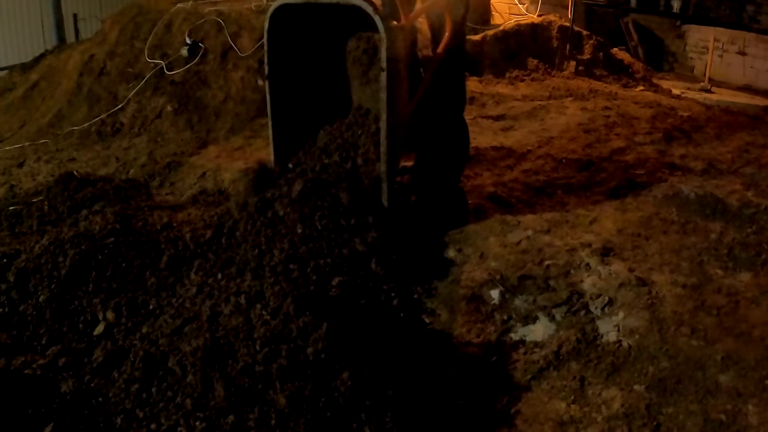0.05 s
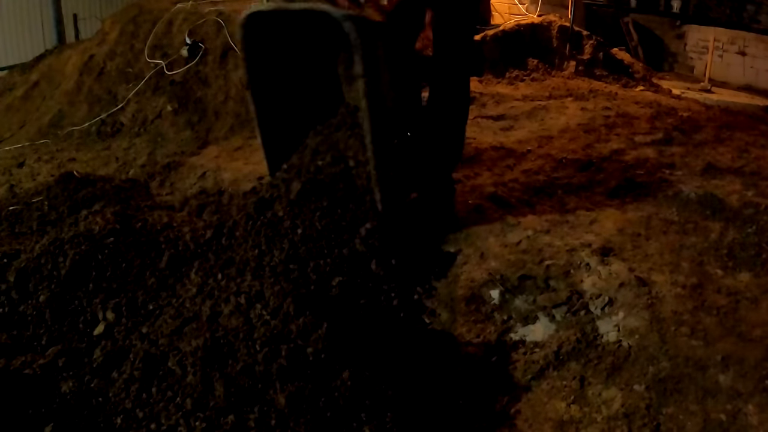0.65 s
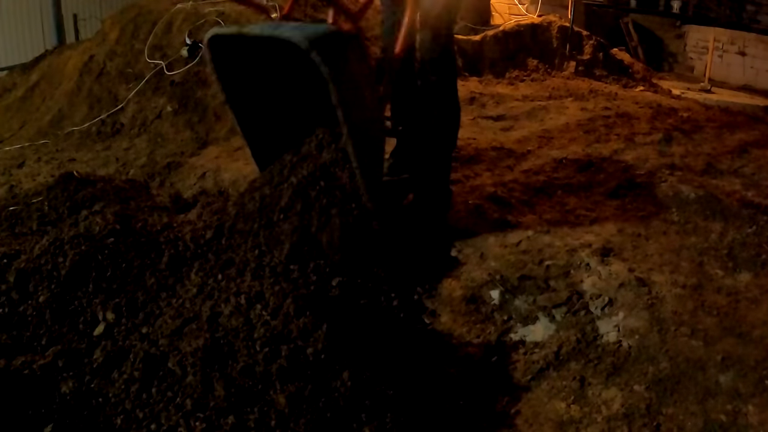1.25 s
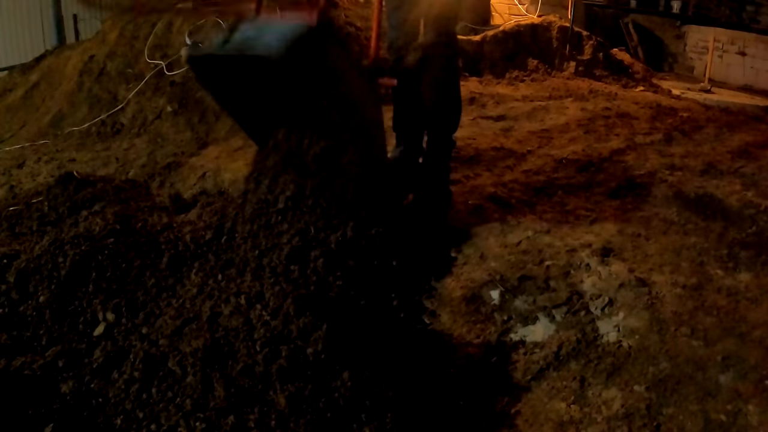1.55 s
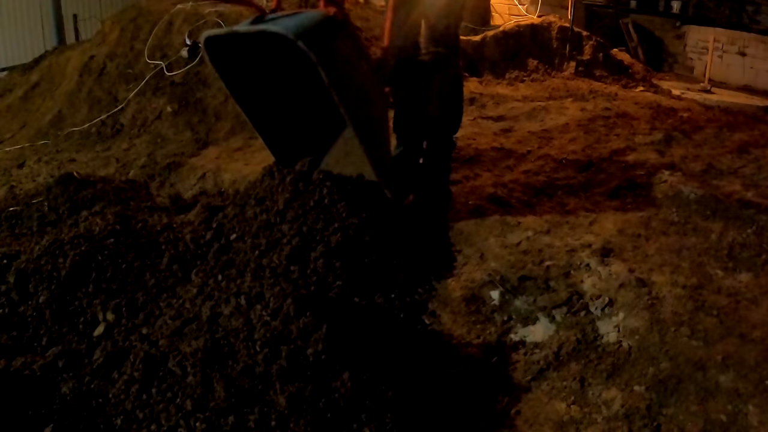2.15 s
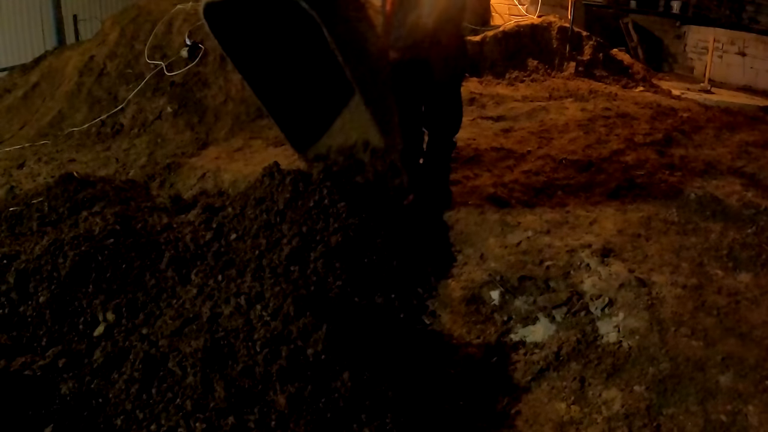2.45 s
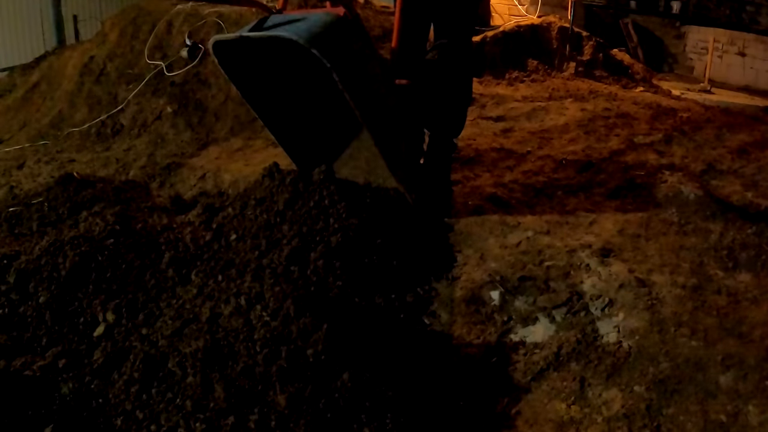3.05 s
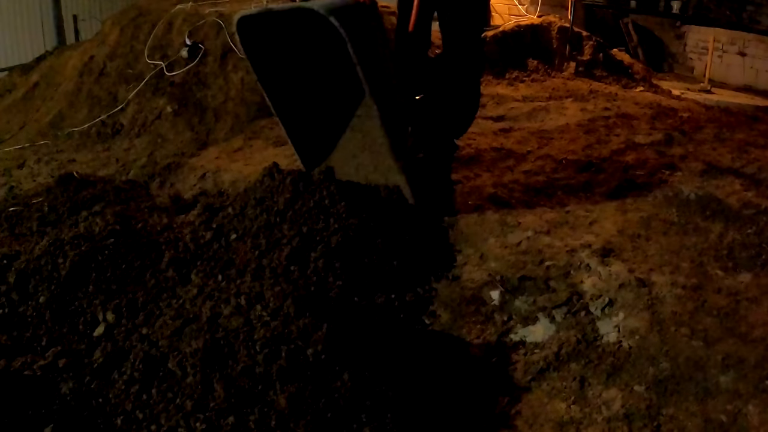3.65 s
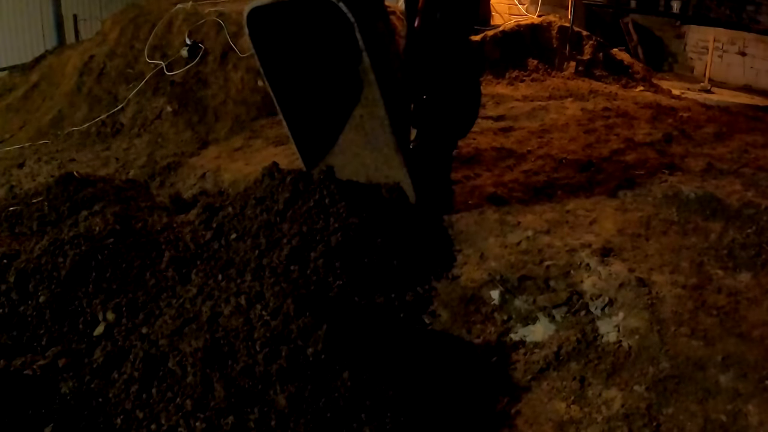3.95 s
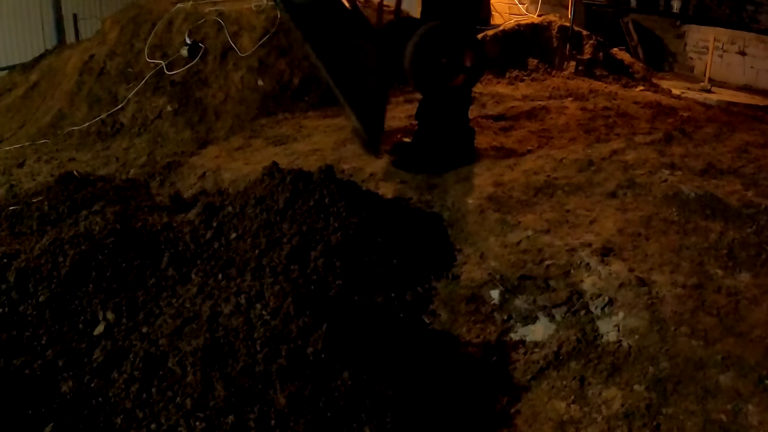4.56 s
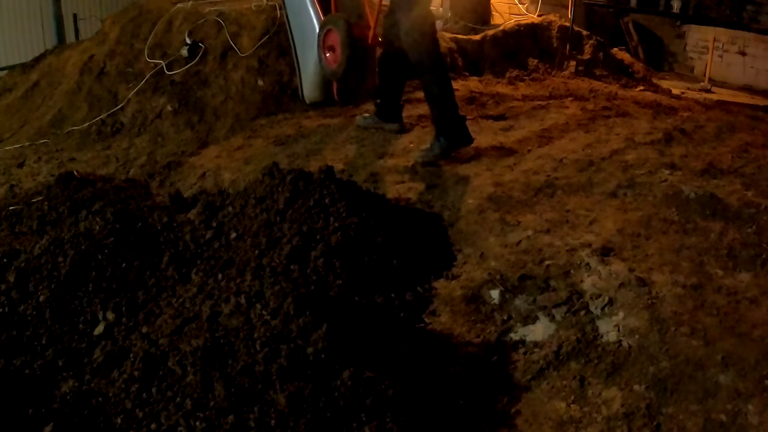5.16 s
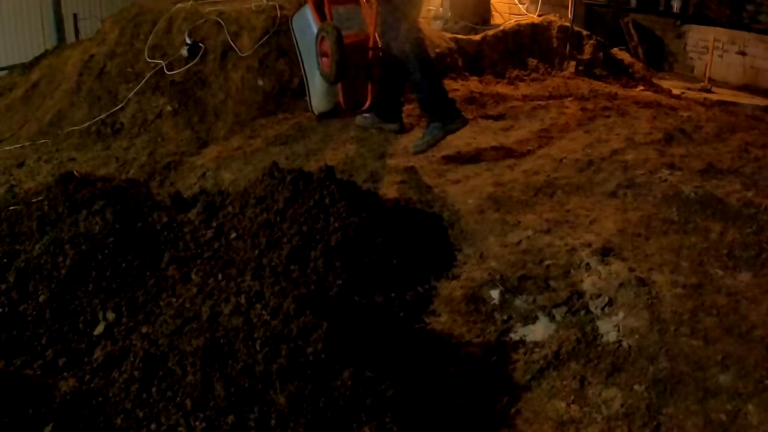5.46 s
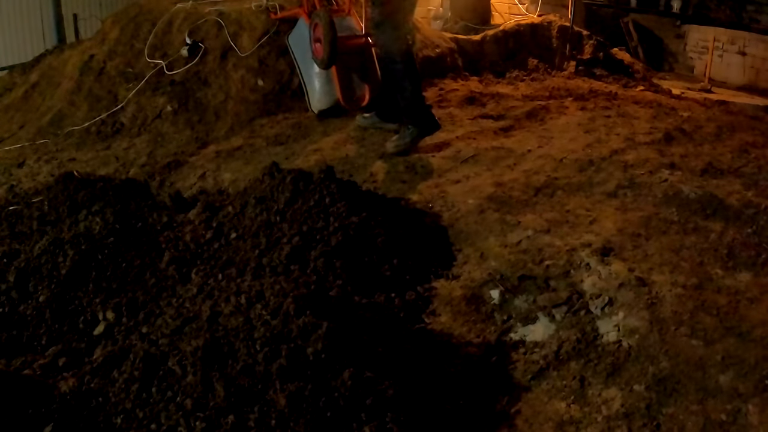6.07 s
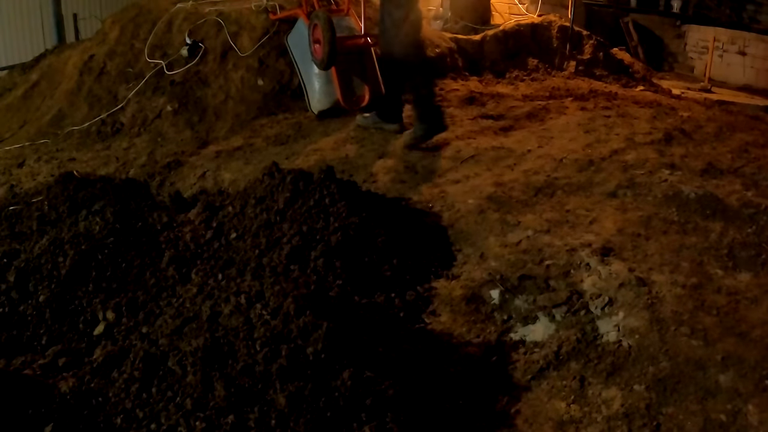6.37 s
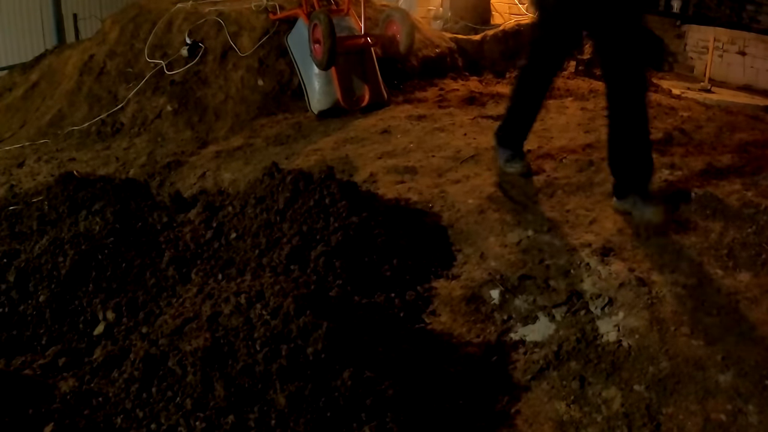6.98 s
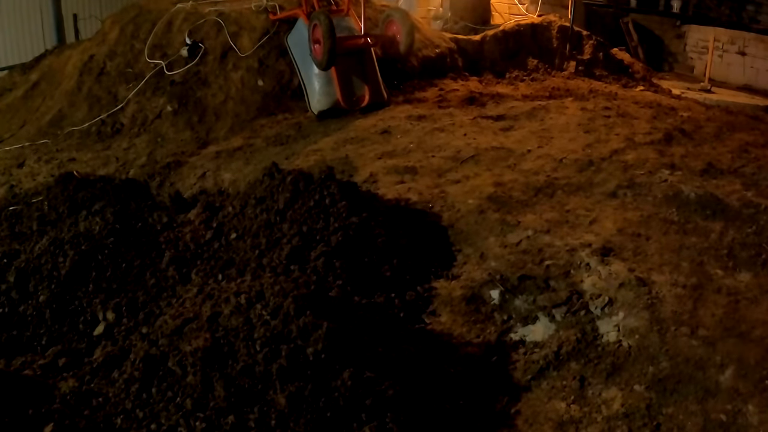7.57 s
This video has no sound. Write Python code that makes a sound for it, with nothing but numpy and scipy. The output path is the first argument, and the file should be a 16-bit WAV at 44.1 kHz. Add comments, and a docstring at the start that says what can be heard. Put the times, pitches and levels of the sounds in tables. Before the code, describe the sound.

Earth trickles from a wheelbarrow outdoors, two loud rattling metal bangs shake it empty, then the wheel ticks and boots tread on dirt.

```python
"""On a building plot, over distant traffic and a low rumble, earth trickles and a wheel ticks as a steel
wheelbarrow is tipped onto a pile of soil. At 1.7 s and 2.8 s it is slammed to empty it: each impact
excites the modes of the tub, which booms, rattles in weakening rebounds and spills crumbs of earth.
From 4.5 s the wheel ticks again as the barrow is pulled back and stood up. Last, boots tread away
over the dirt, each a few soft bumps with a scuff of grit."""
import sys
import numpy as np
from scipy import signal
from scipy.fft import rfft, irfft
from scipy.io import wavfile
from scipy.ndimage import uniform_filter1d, minimum_filter1d

SR = 44100
rng = np.random.default_rng(int(sys.argv[2]) if len(sys.argv) > 2 else 0)


def int16_out(signal):
    """Quantize to a 16-bit WAV file."""
    q = np.round(np.clip(np.atleast_2d(signal).T, -1, 1) * 32767)
    wavfile.write(sys.argv[1], SR, q.astype(np.int16))


N = 344862

# impacts on the whole tub; the second slam strikes twice
# (t/s, ring/dB, place from 0 nose to 1 frame, rebound gap/s, thump/dB, clatter/dB, crack/dB, spill/dB)
SLAMS = [(1.709, 5, 0, .0125, -16.5, -12.5, -32.5, -39), (2.7866, 6, 0.96, .019, -20, -16, -25.5, -33),
         (2.944, -6.5, 0.46, .0095, -20, -31, -37.5, -53)]
# spectrum of a dry tick (f/Hz, level/dB, T60/s)
TICK_SPECTRUM = [(800, -10, 0.0048), (3000, -1.5, 0.0061), (5240, -1, 0.0035), (6500, -17, .005),
                 (8200, -4, 0.011), (10500, -14.5, 0.0045), (12500, -23, 0.0029), (13800, -32, 0.0037)]


def amp(db):
    """Amplitude ratio of a level in decibels."""
    return 10 ** (np.asarray(db) / 20)


def unit(x):
    """Normalisation to rms 1."""
    return x / np.sqrt(np.mean(x ** 2) + 1e-20)


def at_hz(table, hz, column=1):
    """Interpolation of a table column over log frequency."""
    columns = np.transpose(table)
    return np.interp(np.log(hz + 1), np.log(columns[0] + 1), columns[column])


def curve(table):
    """Linear interpolation of (t/s, value) rows at every sample."""
    return np.interp(np.arange(N) / SR, *np.transpose(table))


def add(mix, s, sound):
    """Superposition of a sound on the mix, starting at time s."""
    part = mix[max(round(s * SR), 0):][:len(sound)]
    part += sound[:len(part)]


def colour(x, spectrum):
    """Spectral shaping of a long signal, at rms 1."""
    return unit(irfft(rfft(x) * amp(at_hz(spectrum, np.fft.rfftfreq(N, 1 / SR))), N))


def burst(spectrum, rise_s, tilt_db=0, size=20000, band_count=14):
    """Frequency-dependent damping: each noise band has its own decay. The tilt is per octave."""
    hz, t = np.fft.rfftfreq(size, 1 / SR), np.arange(size) / SR
    magnitude = amp(at_hz(spectrum, hz) + tilt_db * np.log2(hz / SR + 0.0012))
    bins = magnitude * np.exp(2j * np.pi * rng.random(len(hz)))
    edges = np.geomspace(30, SR / 2, band_count)
    in_band = np.searchsorted(edges, hz) == np.arange(band_count)[:, None]
    bands = irfft(bins * in_band, size)
    decay = np.exp(-np.log(1000) * t / at_hz(spectrum, edges, column=2)[:, None])
    return (bands * decay).sum(0) / bands.sum(0).std() * (1 - np.exp(-t / rise_s))


def gritty(x, spread_db, width=30):
    """Random amplitude modulation breaks a sound into grains at the same mean power."""
    wander = unit(uniform_filter1d(rng.standard_normal(len(x)), width))
    return x * unit(amp(spread_db * wander))


def waver(slow_hz=0.794, fast_hz=5, count=20):
    """Slow sines of random phase sum to a fluctuation of rms 1."""
    t = np.arange(0, N, 256) / SR
    rates = np.geomspace(slow_hz, fast_hz, count)
    waves = sum(np.sin(2 * np.pi * (hz * t + rng.random())) / np.sqrt(hz) for hz in rates)
    return np.interp(np.arange(N) / SR, t, unit(waves))


def diffuse_field(spectrum, level_db):
    """Noise from all round is nearly coherent at the two ears in the bass, less so above."""
    # likeness of left and right (f/Hz, coherence)
    coherence = [(60, 0.99), (130, 0.99), (290, 0.94), (620, 0.75), (1360, 0.26), (2970, 0.41),
                 (6490, 0.47), (14200, 0.6)]
    left, independent = rfft(rng.standard_normal((2, N)))
    shared = np.clip(at_hz(coherence, np.fft.rfftfreq(N, 1 / SR)), 0, 1)
    right = shared * left + np.sqrt(1 - shared ** 2) * independent
    return colour(irfft(np.array([left, right]), N), spectrum) * amp(level_db)


def traffic(waver_db=0.43):
    """Distant vehicles merge into diffuse broadband noise."""
    # traffic spectrum (f/Hz, level/dB)
    spectrum = [(60, -8.5), (150, -5.5), (260, -1.5), (450, -2.5), (840, -3.5), (930, 3.5), (1200, 0),
                (1700, -6), (2300, -15.5), (3200, -25), (4500, -34.5), (8000, -45.5), (11000, -70.5),
                (14000, -80)]
    # its envelope (t/s, level/dB)
    levels = [(0, -44), (1.6, -43), (2.2, -44.5), (3.5, -45), (4.6, -43.5), (5.7, -42), (6.31, -40),
              (6.36, -47), (7.1, -47), (7.82, -46)]
    return diffuse_field(spectrum, curve(levels) + waver_db * waver())


def rumble(waver_db=1.0):
    """Slow amplitude modulation makes diffuse low noise lumpy."""
    # rumble spectrum (f/Hz, level/dB)
    spectrum = [(10, -12.5), (25, -11), (45, -5.5), (64, -0.5), (85, -5), (120, -10.5), (170, -16.5),
                (300, -23.5), (1000, -72.5), (14000, -105)]
    # its envelope (t/s, level/dB)
    levels = [(0, -38.5), (.8, -35.5), (.92, -41), (1.3, -36.5), (3.2, -36.5), (3.8, -42.5), (4.1, -39.5),
              (5.5, -38.5), (6.28, -37.5), (6.38, -43.5), (7.82, -40.5)]
    return diffuse_field(spectrum, curve(levels) + waver_db * waver())


def soil_flow(rise_s=0.02, hold_s=0.067, fade_db_per_s=157):
    """Incoherent sources add in power: the joint amplitude of trickle, slides and slam spills."""
    # loose earth trickling as the barrow is handled (t/s, level/dB)
    trickle = [(0, -75), (.7, -67.5), (1.65, -64), (2.3, -75), (2.7, -67.5), (3.6, -75.5), (4.1, -77),
               (4.3, -66.5), (5.1, -71), (5.8, -78), (6.4, -79), (7.3, -69), (7.8, -71.5)]
    # swells of sliding or scuffed earth (peak t/s, length/s, level/dB)
    slides = [(0.044, .2, -62.5), (0.403, 0.28, -61), (0.94, 0.21, -65), (1.48, 0.16, -54.5),
              (2.01, 0.28, -60), (4.839, 0.57, -64.5), (5.09, 0.18, -61), (5.497, 0.28, -70),
              (6.98, 0.24, -68.5), (7.316, 0.18, -66.5), (7.82, 0.089, -65)]
    t = np.arange(N) / SR
    power = amp(curve(trickle)) ** 2
    for s, length, db in slides:
        power += (amp(db) * np.exp(-2 * np.pi * ((t - s) / length) ** 2)) ** 2
    for s, *_, spill_db in SLAMS:
        onset = np.clip((t - s) / rise_s, 0, 1)
        fade_db = fade_db_per_s * np.maximum(t - s - hold_s, 0)
        power += (onset * amp(spill_db - fade_db)) ** 2
    return np.sqrt(power)


def soil(grains_per_s=1800, spread_db=2.5, hiss=0.7):
    """Shot noise: tiny crumbs of uneven size land at random instants, over a hiss."""
    # spectrum of moving crumbs (f/Hz, level/dB)
    spectrum = [(800, -41.5), (2500, 5.5), (3900, -0.5), (5200, 3.5), (7500, -5), (9000, -10),
                (12000, -15.5), (13800, -51)]
    sizes = amp(spread_db * np.minimum(rng.exponential(1, N), 4)) * rng.standard_normal(N)
    landings = rng.random(N) < grains_per_s / SR
    stream = unit(sizes * landings) + hiss * rng.standard_normal(N)
    return colour(stream, spectrum) * soil_flow()


def clods(uneven_db=3, tilt_spread_db=5, rise_s=0.00096, crumb_s=0.0053, count=8):
    """Fracture gives each clod a short crunch; smaller ones dribble out at uneven intervals."""
    # spectrum of a crunch (f/Hz, level/dB, T60/s)
    crunch = [(500, -28, 0.027), (2000, 3, .04), (3200, 6, 0.077), (5300, 4, 0.038), (7500, -2.5, 0.076),
              (9500, -7.5, 0.13), (12500, -12.5, 0.028), (13800, -41.5, .03)]
    # larger clods breaking (t/s, level/dB, tilt/(dB per octave))
    breaks = [(.095, -47.5, -3), (.6704, -43.5, -5.5), (1.4262, -42, 0), (1.4729, -44, 5),
              (1.505, -39.5, -5.5), (2.047, -46.5, 3), (2.4113, -46, -3), (2.4983, -46, -3),
              (3.264, -45, 4.5), (3.483, -49.5, -5), (4.1755, -44.5, -1.5), (4.2382, -43.5, -3),
              (4.6016, -44, -3.5), (5.468, -31, -11), (6.095, -38, -10.5), (6.219, -45, -2),
              (6.2611, -41, -9.5)]
    # last crumbs leaving the tub (start t/s, end t/s, level/dB)
    dribbles = [(2.452, 2.759, -45), (3.229, 3.459, -53)]
    out, t = np.zeros(N), np.arange(4096) / SR
    for s, db, tilt_db in breaks:
        add(out, s, amp(db) * burst(crunch, rise_s, tilt_db, size=len(t)))
    for start, end, db in dribbles:
        for k, (shift, force, bright) in enumerate(rng.uniform(-1, 1, (count, 3))):
            s = start + (end - start) * (k + shift / 2) / count
            crumb = burst(crunch, rise_s, tilt_spread_db * bright, size=len(t)) * np.exp(-t / crumb_s)
            add(out, s, amp(db + uneven_db * force) * crumb)
    return out


def boots(heaviest_at=0.34, fade_db_per_roll=12.5, bumps=6):
    """Impact and friction: a boot rolls from heel to toe in soft bumps, grinding the grit."""
    # footfalls (t/s, length of roll/s, weight/dB, grit/dB)
    steps = [(.66, 0.098, -35, -65), (4.615, 0.043, -35, -70), (5.44, .14, -19, -55.5),
             (6.092, 0.026, -27.5, -58), (6.17, .11, -32, -66), (6.604, 0.0064, -42, -69),
             (6.68, 0.043, -49, -65), (7.28, .06, -52, -63), (7.599, 0.031, -43, -61)]
    # thud on packed earth (f/Hz, level/dB, T60/s)
    thud = [(25, -12, .08), (70, 1, 0.11), (131, 0.5, 0.23), (250, 4.5, 0.098), (363, -20, 0.078),
            (900, -19, 0.12), (4000, -84, .03)]
    # grit under the sole (f/Hz, level/dB, T60/s)
    scuff = [(500, -17, .06), (1500, -8, .06), (2800, 17.5, 0.18), (4000, 9, 0.17), (6500, 3, 0.28),
             (12000, -59, 0.035)]
    out = np.zeros(N)
    for s, length, weight_db, grit_db in steps:
        for roll in (np.arange(bumps) + rng.random(bumps) / 2) / bumps:
            weight = amp(weight_db) * burst(thud, rise_s=0.0041, size=8192)
            grit = amp(grit_db) * gritty(burst(scuff, rise_s=0.0024, size=8192), spread_db=6.5)
            load = amp(-fade_db_per_roll * abs(roll - heaviest_at))
            add(out, s + roll * length, load * (weight + grit))
    return out


def tick(catch_db=-7):
    """A heavily damped transient, with a weaker catch a moment later."""
    out = burst(TICK_SPECTRUM, rise_s=0.00017, size=2048)
    delay_s = rng.uniform(.0031, .016)
    add(out, delay_s, amp(catch_db) * burst(TICK_SPECTRUM, rise_s=0.00018, size=1024))
    return out


def wheel_and_stones(jitter=0.084, uneven_db=3, max_ticks=18):
    """A pulse train whose rate follows the speed of the wheel; now and then a stone clicks."""
    # turns of the wheel (start t/s, end t/s, first tick rate/Hz, last tick rate/Hz, level/dB)
    spins = [(1.236, 1.466, 21, 23, -45.5), (4.458, 4.638, 27, 12, -44.5), (4.666, 4.982, 58, 36, -41.5),
             (5.031, 5.15, 79, 95, -42.5)]
    # small stones clicking (t/s, level/dB)
    stones = [(1.4586, -36.5), (3.306, -43), (3.3296, -45), (3.4298, -48.5), (5.676, -45.5), (5.896, -46)]
    out = np.zeros(N)
    for start, end, first_rate, last_rate, db in spins:
        s = start
        for shift, force in rng.uniform(-1, 1, (max_ticks, 2)):
            add(out, s, (s < end) * amp(db + uneven_db * force) * tick())
            s += (1 + jitter * shift) / np.interp(s, [start, end], [first_rate, last_rate])
    for s, db in stones:
        add(out, s, amp(db) * tick())
    return out


def crack(chink_hz, snap_s=.003, bandwidth_hz=900):
    """A snap breaks into gritty spray and excites the resonance of a small steel part."""
    # spectrum of the spray (f/Hz, level/dB, T60/s)
    spectrum = [(400, -10, .05), (1500, 0.5, 0.031), (2700, 2, .09), (4050, -6, 0.086), (5400, -3, 0.21),
                (7500, -8.5, 0.06), (9000, -14.5, 0.1), (12400, -22, 0.048), (15000, -66, 0.035)]
    spray = gritty(burst(spectrum, rise_s=0.00049), spread_db=2.5)
    t = np.arange(len(spray)) / SR
    snap = spray * (.75 + 1.5 * np.exp(-t / snap_s))
    resonator = signal.iirpeak(chink_hz, chink_hz / bandwidth_hz, SR)
    return (snap + signal.lfilter(*resonator, snap)) / np.sqrt(2)


def blow(thump_db, clatter_db, crack_db, chink_hz):
    """Impulsive excitation: at one contact the pile thumps and loose steel clatters and cracks."""
    # thump of the soil pile (f/Hz, level/dB, T60/s)
    pile = [(22.1, -20, .25), (40, 8, 0.48), (75, -10, 0.12), (121, 1.5, 0.49), (200, -0.5, 0.62),
            (292, -11, 0.16), (600, -31, 0.058), (3000, -71, 0.045)]
    # clatter of sheet steel (f/Hz, level/dB, T60/s)
    sheet = [(100, -23.5, .3), (290, -16.5, 0.17), (400, -3, 0.44), (624, -8, 0.43), (1050, -5, 0.18),
             (1420, -12.5, 0.15), (2160, -18.5, 0.1), (3200, -22, 0.071), (9000, -63.5, 0.068)]
    thump = amp(thump_db) * burst(pile, rise_s=0.001)
    clatter = amp(clatter_db) * burst(sheet, rise_s=0.0014)
    return thump + clatter + amp(crack_db) * crack(chink_hz)


def tub_ring(place, rise_s=0.0005, aftersound_db=-25, aftersound_stretch=3.64, size=66000):
    """Modal superposition: the place struck weights the modes, and each decays in two stages."""
    # modes of the tub (f/Hz, struck on the nose/dB, jolted through the frame/dB, first-stage T60/s)
    modes = [(39, -27, -17, .45), (62.8, -13, -23, 1.6), (101, -30, -20, .65), (114, -31, -25, .7),
             (129, -20, -27, .6), (173, -19, -15, .6), (182, -7, -21, .45), (203, -29, -23, .85),
             (228, -30, -25, .85), (247, -31, -29, .8), (353, -35, -22, .6), (379, -20, -24, .5),
             (409, -35, -26, .45), (439, -29, -27, .35), (460, -24, -34, .52), (482, -25, -36, .38),
             (502, -30, -29, .45), (538, -28, -28, .4), (552, -21, -38, .5), (616, -26, -36, .36),
             (692, -22, -33, .34), (756, -24, -38, .36), (787, -33, -31, .28), (853, -27, -37, .33),
             (907, -19, -33, .28), (947, -32, -30, .3), (1128, -22, -31, .3), (1182, -27, -36, .3),
             (1243, -28, -37, .28), (1478, -27, -31, .28)]
    t = np.arange(size) / SR
    hz, nose_db, frame_db, t60 = np.transpose(modes)[:, :, None]
    sign = np.where(np.arange(len(modes)) % 2, -1, 1)[:, None]  # neighbours start in antiphase
    partials = sign * amp(nose_db + place * (frame_db - nose_db)) * np.sin(2 * np.pi * hz * t)
    fall = np.log(1000) * t / t60
    decay = np.exp(-fall) + amp(aftersound_db) * np.exp(-fall / aftersound_stretch)
    return (partials * decay).sum(0) * (1 - np.exp(-t / rise_s))


def slams(jitter=.25, uneven_db=3.0, low_hz=2500, high_hz=7400, rebounds=8):
    """Inelastic rebound: each slam rings the tub and sets off a rattle of weakening contacts."""
    # single blows besides the rattle, from a soft lead-in before the first slam to the loudest contacts (t/s,
    # thump/dB, clatter/dB, crack/dB, chink f/Hz)
    single_blows = [(1.689, -24.5, -34.5, -45, 5000), (1.697, -15, -25.5, -24.5, 2950),
                    (1.719, -15, -9, -28, 5500), (1.7907, -22, -29, -28, 11500),
                    (2.781, -8.5, -25.5, -33, 3000), (2.7862, -13.5, -15, -15, 7340),
                    (2.808, -22.5, -20.5, -17, 4610), (2.8345, -24.5, -24, -16, 4800),
                    (2.850, -19, -17.5, -32, 5500), (2.880, -18, -17, -28, 5400),
                    (2.902, -10.5, -27, -21, 5700), (2.985, -20, -35, -30.5, 5300),
                    (3.010, -24, -43, -32.5, 2800)]
    thump_fade, clatter_fade, crack_fade = 19.5, 85, 53.5  # dB/s
    out = np.zeros(N)
    for s, ring_db, place, gap, thump_db, clatter_db, crack_db, _ in SLAMS:
        add(out, s, amp(ring_db) * tub_ring(place))
        for k, (shift, force, part) in enumerate(rng.uniform(-1, 1, (rebounds, 3))):
            delay = gap * (k + .5 + jitter * shift)
            chink_hz = low_hz + (high_hz - low_hz) * abs(part)
            rebound = blow(thump_db - thump_fade * delay, clatter_db - clatter_fade * delay,
                           crack_db - crack_fade * delay, chink_hz)
            add(out, s + delay, amp(uneven_db * force) * rebound)
    for s, *contact in single_blows:
        add(out, s, blow(*contact))
    return out


def tub_flex(s=2.408, hz=124, level_db=-24, swell_s=0.023, size=10000):
    """Flexural vibration: the tub gives a soft low note as it is lifted."""
    out, t = np.zeros(N), np.arange(size) / SR
    envelope = t / swell_s * np.exp(1 - t / swell_s)
    add(out, s, amp(level_db) * np.sin(2 * np.pi * hz * t) * envelope)
    return out


def pops(drop_hz=1100, end_hz=95, decay_s=.0065, size=2048):
    """A damped downward chirp: a click drops at once into a short low knock."""
    # hollow pops (t/s, knock/dB, click/dB, time constant of the pitch drop/s)
    events = [(2.609, -24, -39, .0016), (5.0487, -17, -32, .00062)]
    out, t = np.zeros(N), np.arange(size) / SR
    for s, knock_db, click_db, drop_s in events:
        cycles = np.cumsum(end_hz + drop_hz * np.exp(-t / drop_s)) / SR
        knock = -np.sin(2 * np.pi * cycles) * np.exp(-t / decay_s)
        add(out, s, amp(knock_db) * knock)
        add(out, s, amp(click_db) * burst(TICK_SPECTRUM, rise_s=.0001, tilt_db=-5.0, size=1024))
    return out


def ground_scatter(x, low_hz=900, t60_s=.06, level_db=-12, size=6000):
    """Scattering from the ground and heaps gives each ear its own brief impulse response."""
    t = np.arange(size) / SR
    taps = rng.standard_normal((2, size)) * np.exp(-np.log(1000) * t / t60_s)
    taps = signal.sosfilt(signal.butter(1, low_hz, "high", fs=SR, output="sos"), taps)
    return amp(level_db) * signal.fftconvolve(x[None], taps / np.linalg.norm(taps[0]), axes=1)[:, :N]


def gain_control(x, threshold_db=-24, share=0.26, attack_s=0.021, hold_s=0.56, recover_db_per_s=13):
    """Compression: gain falls by a share of the excess level, holds, then slowly recovers."""
    pole = np.exp(-1 / (attack_s * SR))
    power_db = 10 * np.log10(signal.lfilter([1 - pole], [1, -pole], (x ** 2).mean(0)) + 1e-12)
    target_db = -share * np.maximum(power_db - threshold_db, 0)
    half = int(hold_s * SR / 2)
    held_db = minimum_filter1d(target_db, 2 * half + 1, origin=half, mode="constant")
    climb_db = recover_db_per_s * np.arange(N) / SR
    return x * amp(np.minimum.accumulate(held_db - climb_db) + climb_db)


def scene(lag_samples=.4):
    """Interaural time and level differences set the work slightly right, over the background."""
    heavy = slams() + tub_flex() + soil() + clods() + boots()
    work = heavy + wheel_and_stones() + pops()
    delayed = irfft(rfft(work) * np.exp(-2j * np.pi * np.fft.rfftfreq(N) * lag_samples), N)
    direct = np.array([amp(-2.66) * delayed, amp(-1.4) * work])
    return direct + ground_scatter(heavy) + traffic() + rumble()


def record(dry, ceiling=0.8, cutoff_hz=14400):
    """Compression ducks the mix after each slam; soft saturation and a band limit follow."""
    rounded = ceiling * np.tanh(gain_control(dry) / ceiling)
    lowpass = signal.firwin(301, cutoff_hz, window=("kaiser", 9), fs=SR)
    return signal.oaconvolve(rounded, lowpass[None], "same")


dry = scene()
out = record(dry)
int16_out(out)
```